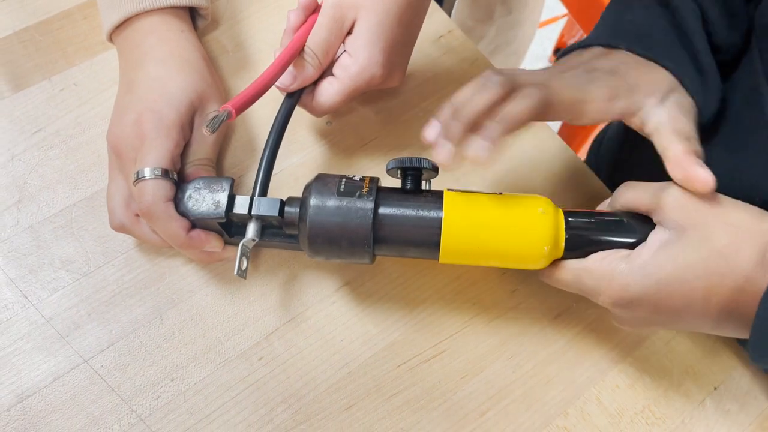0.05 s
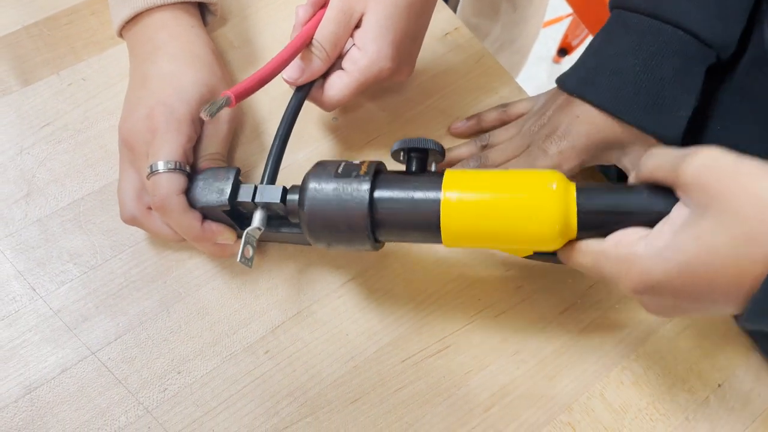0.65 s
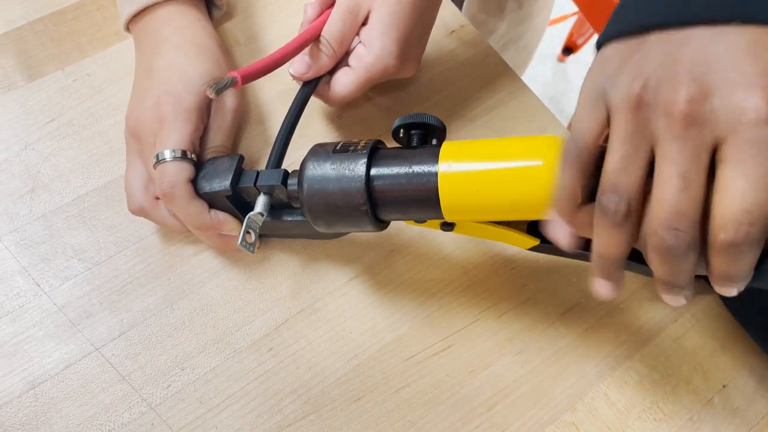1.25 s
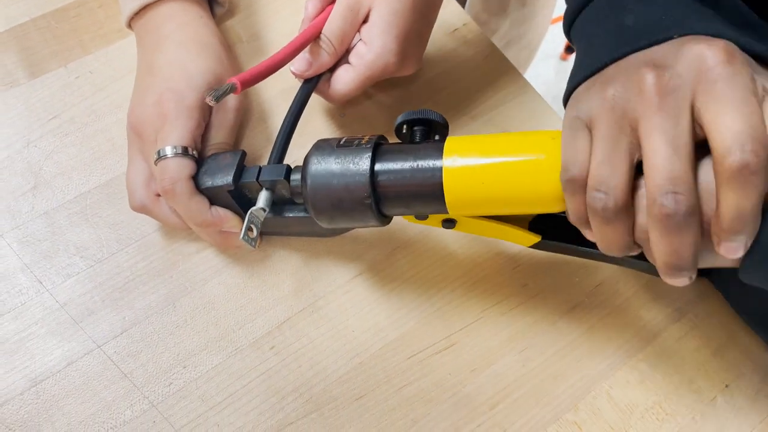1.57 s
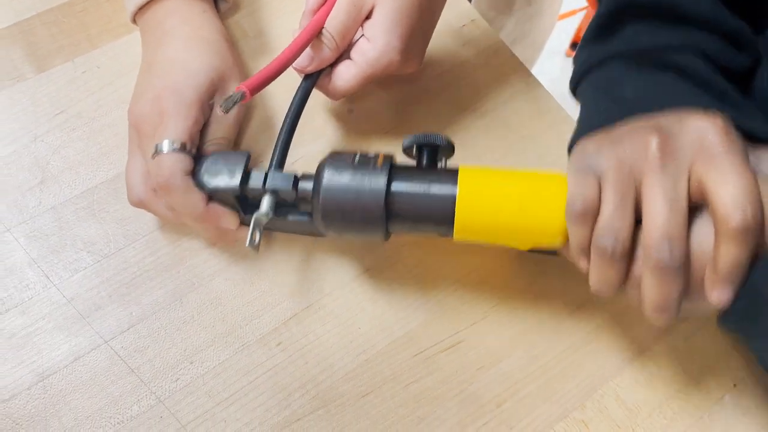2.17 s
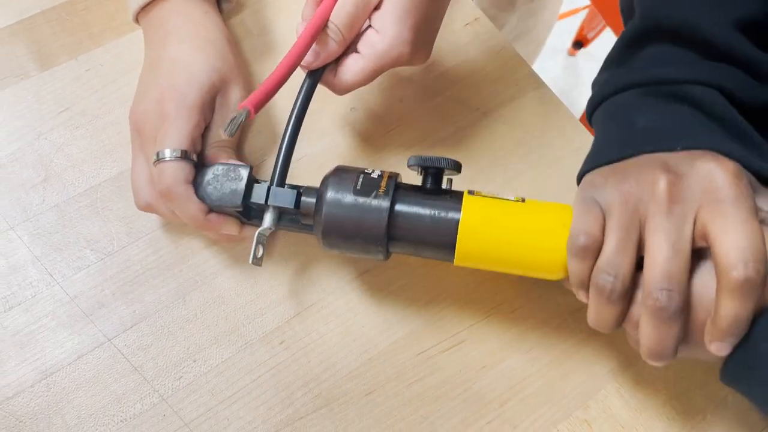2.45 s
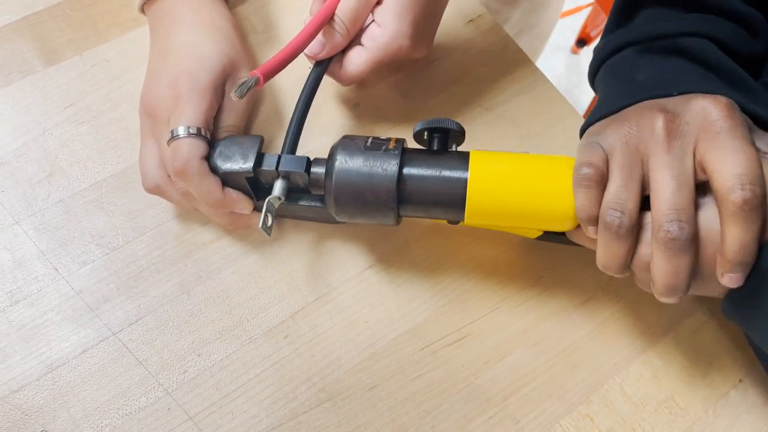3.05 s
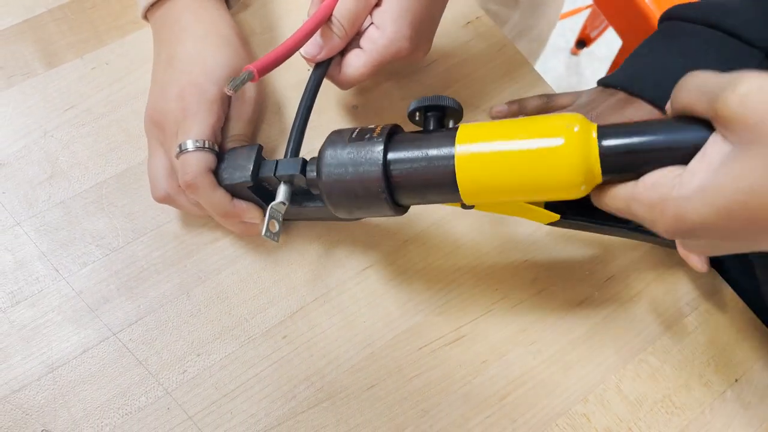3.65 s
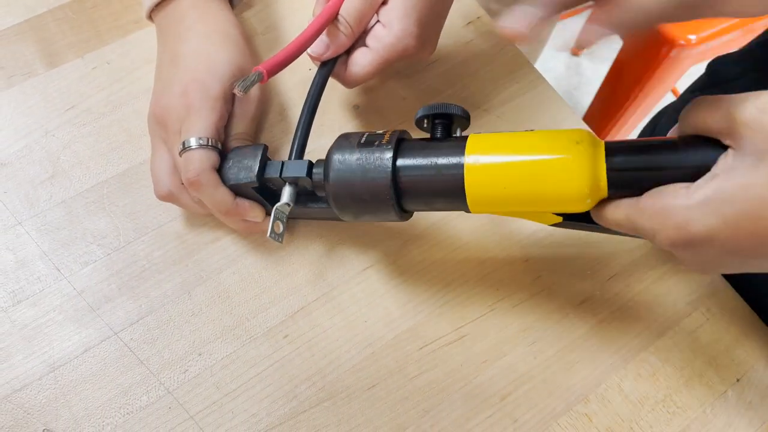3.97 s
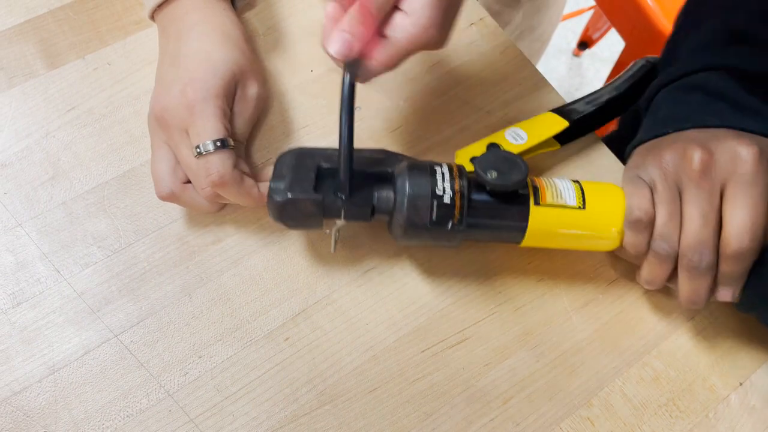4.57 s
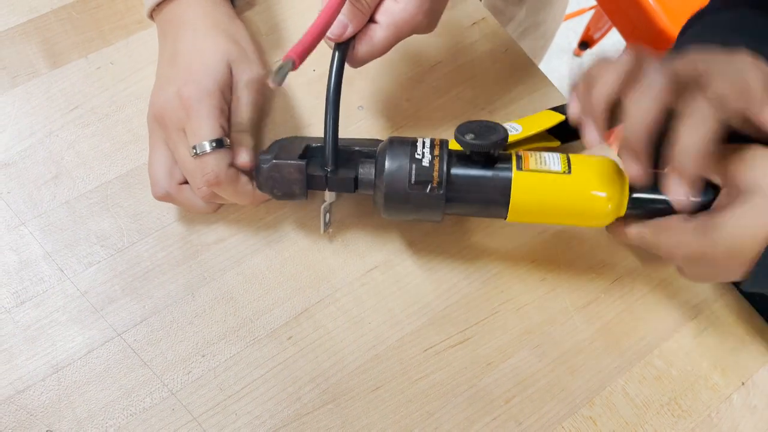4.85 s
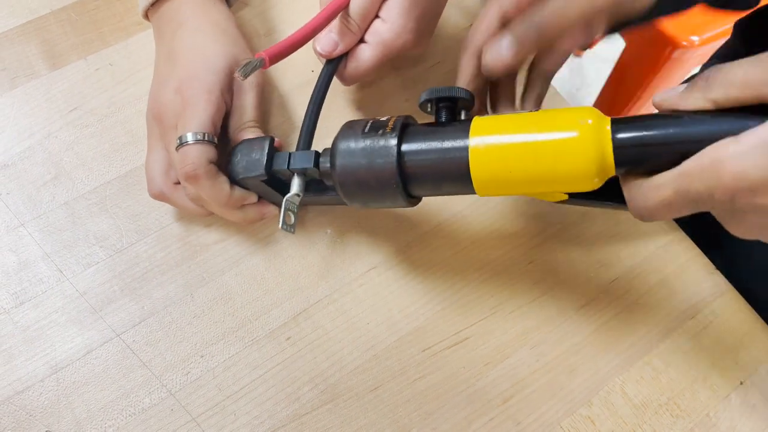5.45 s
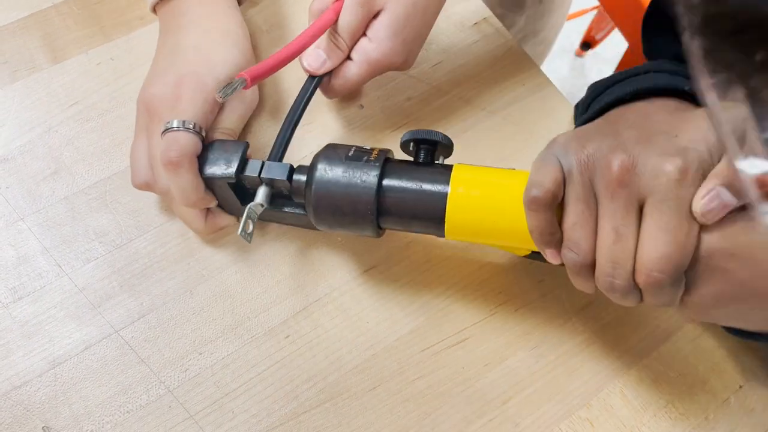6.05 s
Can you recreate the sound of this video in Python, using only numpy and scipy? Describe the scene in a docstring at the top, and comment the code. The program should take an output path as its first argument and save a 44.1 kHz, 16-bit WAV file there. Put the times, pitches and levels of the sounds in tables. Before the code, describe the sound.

A low ventilation rumble with a faint fan hum runs throughout in a workshop. Close to the microphone, sleeves rustle and palms rub softly as a hand-pumped crimper is worked on a wooden table. From 0.5 seconds the steel lever ticks and the tool knocks dully, with a firmer thump and click at 1 second, then a faint, thin pivot squeak. At 2.2 seconds the lever snaps against its stop and the table shudders with a low boom. After a lull, a sharp metallic click and wooden clack land at about 3.5 seconds, and another knock near 4. The loudest moment comes around 4.5 seconds: a quick cluster of heavy thumps and hard clacks as the tool tips over, scuffs and rings briefly. Lighter knocks and ticks follow until 6 seconds, each with a slight scrape, ending in a soft rustle.

```python
"""A hand-pumped hydraulic crimper is levered against a wooden workbench, over steady ventilation.
Sleeves rustle and palms rub; from 0.5 s the steel lever ticks and the tool knocks, each knock a falling
chirp as bending waves cross the top, treble first. The pivot squeaks faintly. At 2.2 s the lever snaps
on its stop and the bench shudders. From 3.5 s knocks and hard clacks crowd in, peaking near 4.5 s as the
tool tips over and rings. Lighter knocks follow until 6 s, each scraping to rest, then a last rustle."""
import sys
import numpy as np
from scipy import signal
from scipy.fft import rfft, irfft
from scipy.io import wavfile

SR = 44100
rng = np.random.default_rng(int(sys.argv[2]) if len(sys.argv) > 2 else 0)


def wav_out(sig):
    """Save sig, one row per channel (or a flat mono array), as 16-bit PCM at SR to the path in sys.argv[1]."""
    wavfile.write(sys.argv[1], SR, np.round(np.clip(np.atleast_2d(sig).T, -1, 1) * 32767).astype(np.int16))


N = 277830
T = np.arange(N) / SR
F = np.maximum(np.arange(N // 2 + 1) * SR / N, 1)
LEFT_RIGHT = np.array([[1], [-1]])


def undb(db):
    """Decibels to gain."""
    return 10 ** (np.asarray(db) / 20)


def along(points):
    """A curve through (Hz, value) points on a log-frequency axis."""
    hz, value = np.transpose(points)
    return np.interp(np.log(F), np.log(hz), value)


def shaped(x, gain):
    """Filter by a gain for every frequency."""
    return irfft(rfft(x) * gain, N)


def unit(x):
    """Scale to rms 1."""
    return x / np.sqrt(np.mean(x ** 2))


def noise(colour, channels=2):
    """Independent noises with a (Hz, dB) colour, at rms 1."""
    return unit(shaped(rng.standard_normal((channels, N)), undb(along(colour))))


def wander(rate_hz):
    """A smooth random wander with spread 1."""
    return unit(shaped(rng.standard_normal(N), np.exp(-(F / rate_hz) ** 2)))


def swell(s, length):
    """A smooth rise and fall around time s."""
    return np.exp(-(2 * (T - s) / length) ** 2)


def swells(moves):
    """Envelope of a table of (centre s, length s, dB) movements."""
    return sum(undb(db) * swell(s, length) for s, length, db in moves)


def contact(s, corner_hz):
    """Spectrum of a smooth push at time s; a softer contact has a lower corner."""
    return np.exp(-2j * np.pi * F * s) / (1 + 1j * F / corner_hz) ** 4


def favouring(hz, q, freqs=F):
    """The place of a blow favours the modes around one frequency."""
    return 1 / (1 + 1j * q * (freqs / hz - hz / freqs))


def ringing(modes, sag=0, sag_s=0.034):
    """Spectrum of a set of decaying modes; their pitch may start high and sag."""
    t = T[:SR]
    warped = t + sag * sag_s * (1 - np.exp(-t / sag_s))
    ring = sum(undb(db) * np.sin(2 * np.pi * hz * warped) * undb(-60 * t / t60) for hz, db, t60 in modes)
    return rfft(ring, N)


def alternating(modes):
    """Spectrum of ringing modes, every other one in opposite polarity."""
    return ringing(modes[::2]) - ringing(modes[1::2])


def resonances(peaks):
    """Steep response of (Hz, half-width Hz, dB) resonances, with unit power gain."""
    gain = sum(undb(db) * favouring(hz, hz / (2 * width)) ** 2 for hz, width, db in peaks)
    return gain / np.sqrt(np.mean(np.abs(gain) ** 2))


def voiced(burst, response):
    """Spectrum of a random burst, scaled to ring a response as strongly as an even burst would."""
    spectrum, weight = rfft(burst), np.abs(response) ** 2
    power = np.abs(spectrum) ** 2
    return spectrum * np.sqrt(power.mean() * weight.mean() / (power * weight).mean(axis=1, keepdims=True))


def off_centre(x, lag_s):
    """A source off to one side reaches the left microphone later than the right."""
    return shaped(x, np.exp(-1j * np.pi * F * lag_s * LEFT_RIGHT))


# The rumble's colour. Each row: frequency in Hz, relative level in dB.
RUMBLE_COLOUR = [(15, -56.5), (25, -20), (59, 3), (91, -3), (216, -18), (284, -27), (316, -15),
                 (414, -21.5), (769, -26), (4330, -47), (7630, -74), (9720, -60.5), (15800, -71)]
# Stereo width of the air and the reverb. Each row: frequency in Hz, side against mid in dB.
STEREO_WIDTH = [(60, -41.5), (200, -14), (380, -8), (700, 0), (2400, -7), (8000, 3.5)]
# The duct's hollow ring. Each row: centre in Hz, half-width in Hz, relative level in dB.
DUCT_PEAKS = [(870, 110, -4), (997, 210, -0.5), (1320, 34, -22.5), (2635, 130, -7.5)]
# The fan's hum. Each row: pitch in Hz, relative level in dB.
FAN_TONES = [(209.9, -52), (263.8, -61), (317.6, -54.5), (360.7, -58), (775.2, -63.5), (872.1, -67.5),
             (1416, -70.5)]

def ventilation(rumble_db=-40.5, fan_db=-2, duct_db=-61, waver_db=3.0, drift_rad=1.65):
    """Duct rumble, alike in both ears in the bass, with a hollow rush and wavering fan tones."""
    mid, side = noise(RUMBLE_COLOUR)
    rumble = (mid + LEFT_RIGHT * shaped(side, undb(along(STEREO_WIDTH)))) * undb(rumble_db)
    rush = undb(duct_db + wander(8.5)) * shaped(rng.standard_normal((2, N)), resonances(DUCT_PEAKS))
    hum = 0
    for hz, db in FAN_TONES:
        level = undb(db + fan_db + waver_db * wander(0.47))
        hum += level * np.sin(2 * np.pi * hz * T + drift_rad * wander(3.35))
    return rumble + rush + np.sqrt(2) * hum


# The workshop's decay. Each row: band centre in Hz, t60 in seconds.
ROOM_DECAY = [(100, 0.71), (400, 0.53), (1000, 0.25), (4000, 0.082), (12000, 0.11)]
# EQ on the reverb send. Each row: frequency in Hz, gain in dB.
REVERB_SEND = [(60, -6.5), (200, -10.5), (500, -11), (1200, -14), (4000, -12), (12000, -19.5)]

def room(x, predelay_s=0.0034, build_s=0.0012):
    """Diffuse workshop reflections; the treble dies first and the bass is shared by both ears."""
    mid, side = rfft(rng.standard_normal((2, N)))
    width = undb(along(STEREO_WIDTH))
    field = (mid + LEFT_RIGHT * side * width) / np.sqrt(1 + width ** 2) * undb(along(REVERB_SEND))
    age = np.maximum(T - predelay_s, 0)
    tail = 0
    for centre_hz, t60 in ROOM_DECAY:
        band = along([(hz, hz == centre_hz) for hz, _ in ROOM_DECAY])
        fade = (1 - np.exp(-age / build_s)) * undb(-60 * age / t60)
        tail += irfft(field * band, N) * fade / np.sqrt(np.sum(fade ** 2))
    return signal.fftconvolve(x, tail, axes=1)[:, :N]


# An arm pumps or changes grip. Each row: centre in seconds, length in seconds, relative level in dB.
ARM_SWINGS = [(.08, 0.49, -71), (.61, 0.29, -71.5), (1.38, 0.21, -69), (1.6, 0.17, -75),
              (1.93, 0.22, -71.5), (2.2, 0.088, -74), (2.58, 0.2, -79), (3.27, 0.065, -73),
              (3.41, 0.2, -69.5), (3.62, 0.32, -72), (4.23, 0.3, -69.5), (4.58, 0.26, -64.5),
              (5.03, 0.59, -76), (5.55, 0.25, -70.5), (5.72, 0.12, -66.5), (5.88, 0.17, -73),
              (6.25, 0.52, -74)]
# A palm drags on the bench. Each row: centre in seconds, length in seconds, relative level in dB.
PALM_RUBS = [(.21, 0.022, -35), (.75, 0.15, -35), (2.18, 0.11, -37.5), (3.49, 0.16, -37),
             (4.65, 0.058, -20.5), (5.05, 0.27, -34.5), (5.27, 0.15, -44.5), (5.9, 0.027, -39)]

def handling(rub_gain_db=-3, grip_db=-69, slide_gain_db=3, sleeve_gain_db=-2, uneven_db=2, crinkle_db=3):
    """Hands and tool drag unevenly on the wood; each arm move rustles the sleeve and slides the grip."""
    arm = swells(ARM_SWINGS)
    resting = undb(-47)  # hands holding the tool are never quite still
    rub = np.sqrt(resting ** 2 + swells(PALM_RUBS) ** 2 + settling() ** 2) * undb(uneven_db * wander(25))
    slide = np.hypot(undb(grip_db), undb(slide_gain_db) * arm) * undb(uneven_db * wander(19))
    sleeve = arm * undb(uneven_db * wander(21) + crinkle_db * (wander(500) - 0.5))
    wood = noise([(60, -44), (130, 5.5), (200, 0), (330, -6), (520, -20), (1200, -39), (4000, -109)], 1)
    skin = noise([(300, -22), (1500, 4.5), (3000, 11.5), (4600, 10.5), (5800, 7), (6700, 1.5),
                  (7700, -35.5), (15000, -49)])
    cloth_colour = [(2000, -14), (7500, -27.5), (9200, -2.5), (12300, -6), (14000, -18), (16000, -21)]
    shared, *per_ear = noise(cloth_colour, channels=3)
    cloth = unit(off_centre(shared, lag_s=0.000027) + 0.98 * np.array(per_ear))
    return undb(rub_gain_db) * rub * wood + slide * skin + undb(sleeve_gain_db) * sleeve * cloth


# The grip slips. Each row: centre in seconds, length in seconds, level in dB.
GRIP_SCUFFS = [(1.211, 0.043, -58.5), (4.544, 0.06, -50), (4.587, 0.06, -57.5)]

def scuffs(rough_db=4):
    """Skin scuffs brightly over the steel."""
    hiss = noise([(2500, 1), (5000, 2), (6300, -1), (7600, -13), (9500, -2), (12000, -3),
                  (14000, -18), (16000, -4)])
    return swells(GRIP_SCUFFS) * undb(rough_db * wander(190)) * hiss


# The lever lifts. Each row: centre in seconds, length in seconds, pitch in Hz, level in dB.
PIVOT_SQUEAKS = [(1.167, 0.2, 4580, -70.5), (1.34, 0.25, 4650, -70)]

def squeaks(half_width_hz=230, broken_db=3):
    """The dry pivot gives a thin, broken squeak."""
    out = 0
    for s, length, hz, db in PIVOT_SQUEAKS:
        whistle = shaped(rng.standard_normal(N), resonances([(hz, half_width_hz, 0)]))
        out += undb(db) * swell(s, length) * whistle
    return out * undb(broken_db * wander(40))


# Pivot and dies tick. Each row: start in seconds, ping level in dB, ping centre in Hz, barrel level
# in dB, burst t60 in seconds, crack level in dB. Levels are before filtering.
STEEL_TICKS = [(0.5, -48, 4120, -58, 0.031, -47), (0.981, -49, 12000, -71, .008, -38),
               (0.811, -66, 9000, -40, .012, -59), (1.271, -54, 4540, -42, 0.019, -70),
               (1.645, -55, 10140, -74, .036, -62), (2.243, -44, 5700, -27, 0.026, -40.5),
               (2.555, -54, 4400, -66, 0.028, -68), (3.558, -21.5, 4600, -58, 0.006, -38),
               (3.559, -24.5, 5400, -58, 0.012, -34.5), (3.7205, -55, 11000, -80, .008, -54),
               (3.833, -52, 7500, -70, .008, -59), (3.913, -48, 4400, -71, 0.027, -56),
               (3.922, -56, 10500, -72, .01, -57), (3.941, -53, 11500, -70, .008, -49),
               (4.49, -69, 4000, -48.5, 0.86, -69), (4.55, -31.5, 4600, -17, 0.0077, -34),
               (4.5569, -51, 5500, -29, 0.033, -50), (4.588, -50, 6100, -41, 0.12, -46),
               (4.594, -38, 3160, -43, 0.014, -58.5), (4.7166, -35, 6300, -70, 0.0072, -44),
               (4.92, -41.5, 4830, -45, 0.038, -61), (4.938, -67, 3960, -48.5, 0.12, -68),
               (4.957, -48, 4870, -60, 0.022, -58), (5.048, -54, 4460, -66, .007, -56),
               (5.1198, -42, 7600, -62, 0.0069, -57), (5.865, -44, 4900, -38, 0.023, -57),
               (5.922, -43, 9400, -64, 0.016, -48), (5.928, -46, 5200, -60, .012, -49),
               (5.947, -48, 4400, -48, 0.02, -62), (6.086, -53, 8700, -72, 0.0037, -48)]
# The small parts' bright ping. Each row: centre in Hz, half-width in Hz, relative level in dB.
PING_PEAKS = [(2900, 230, -13), (3160, 220, 21), (3600, 88, -21.5), (4050, 270, 15), (4400, 130, 10.5),
              (5500, 400, 11.5), (6500, 140, -9), (10600, 2100, 0), (11000, 680, 2), (13000, 1100, -22)]
# The barrel's lower voice. Each row: centre in Hz, half-width in Hz, relative level in dB.
BARREL_PEAKS = [(1260, 230, 4.5), (1610, 52, 3.5), (1600, 200, -14.5), (2080, 170, -0.5), (2330, 97, -13),
                (2940, 340, -4)]

def ticks(grit_db=4, spread=0.94, rise_s=0.00079, ping_q=4.0, crack_t60_s=0.0085, crack_hz=8500):
    """Steel meets steel with a bright crack and a cluster of tiny impacts that ring parts and barrel."""
    ping, barrel, crack = np.zeros((3, 2, N + SR))
    t = T[:SR // 8]
    freqs = np.maximum(np.fft.rfftfreq(len(t), 1 / SR), 1)
    steel = resonances(PING_PEAKS)
    for s, ping_db, hz, barrel_db, t60, crack_db in STEEL_TICKS:
        shared, left, right, size = rng.standard_normal((4, len(t)))
        grit = unit((shared + spread * np.array([left, right])) * undb(grit_db * size))
        burst = grit * (1 - np.exp(-t / rise_s)) * undb(-60 * t / t60)
        favour = favouring(hz, ping_q, freqs)
        drive = voiced(burst, favour * np.interp(freqs, F, steel))
        span = slice(int(s * SR), int(s * SR) + len(t))
        ping[:, span] += undb(ping_db) * irfft(favour * drive, len(t))
        barrel[:, span] += undb(barrel_db) * burst
        crack[:, span] += undb(crack_db) * shared * undb(-60 * t / crack_t60_s)
    high_pass = 1 / (1 + (crack_hz / F) ** 12)
    ring = 2 * shaped(ping[:, :N], steel) + shaped(barrel[:, :N], resonances(BARREL_PEAKS))
    return ring + shaped(crack[:, :N], high_pass)


# The lever's double clicks. Each row: second click's start in seconds, drive in dB, contact corner
# in Hz, first click against the second in dB, favoured frequency in Hz.
DOUBLE_CLICKS = [(0.499, -36.5, 9300, -8.5, 4150), (0.9817, -25.5, 5330, -9, 3000),
                 (3.4655, -40.5, 6000, 2, 4020), (3.9474, -42.5, 6500, 8, 4400)]
# The lever's ring. Each row: pitch in Hz, relative level in dB, t60 in seconds.
LEVER_MODES = [(1965, -7, 0.02), (2544, -11.5, 0.024), (2920, -8.5, 0.032), (3190, -5, 0.021),
               (3580, -5.5, 0.025), (4130, 0, 0.014), (4750, -7, 0.024), (5330, -1, 0.011),
               (9800, 13, 0.0047), (11300, 14.5, 0.006)]

def lever_clicks(play_s=0.009, vary_db=0.5, detune=0.0038, spot_q=0.93):
    """The lever takes up its play with two clicks; the grip changes its modes a little every time."""
    spectrum = 0
    for s, db, corner_hz, first_db, spot_hz in DOUBLE_CLICKS:
        chance = rng.standard_normal((len(LEVER_MODES), 2))
        modes = [(hz * (1 + detune * shift), mode_db - vary_db * dip, t60)
                 for (hz, mode_db, t60), (shift, dip) in zip(LEVER_MODES, chance)]
        strikes = contact(s, corner_hz) + undb(first_db) * contact(s - play_s, corner_hz)
        spectrum += undb(db) * strikes * favouring(spot_hz, spot_q) * alternating(modes)
    return irfft(spectrum, N)


# The lever closes hard. Each row: start in seconds, drive in dB, contact corner in Hz.
STOP_STRIKES = [(2.2452, -24.5, 7500), (2.2491, -35.5, 7000)]
# The stop's short clink. Each row: pitch in Hz, relative level in dB, t60 in seconds.
STOP_MODES = [(1250, -2.5, 0.023), (1500, -4.5, 0.033), (1690, -5.5, 0.016), (1954, -10.5, 0.028),
              (2220, -9.5, 0.029), (2560, -7.5, 0.015), (2980, -8, 0.024), (3260, -13.5, .02),
              (3970, -13, 0.0088), (5700, -7.5, 0.012)]

def lever_stop():
    """The lever snaps against its stop and bounces once."""
    strikes = sum(undb(db) * contact(s, hz) for s, db, hz in STOP_STRIKES)
    return irfft(strikes * alternating(STOP_MODES), N)


# The tool tips over. Each row: start in seconds, drive in dB, contact corner in Hz.
LANDINGS = [(4.4932, -50, 4000), (4.5509, -36, 7000), (4.5925, -48, 6000)]
# The steel body's note. Each row: pitch in Hz, relative level in dB, t60 in seconds.
BODY_MODES = [(2017, -2, 0.067), (2017, -1.5, 0.083), (3160, -14, .091), (4660, 6, 0.025), (4770, -5, 0.04)]

def body_ring():
    """The steel body sings briefly when it lands, undamped by the hand."""
    strikes = sum(undb(db) * contact(s, hz) for s, db, hz in LANDINGS)
    return irfft(strikes * ringing(BODY_MODES), N)


# Full strokes shake the bench. Each row: start in seconds, drive in dB, push corner in Hz.
FULL_STROKES = [(2.269, -19.5, 301), (3.966, -34.5, 300), (4.313, -29.5, 500), (4.575, -27, 900)]
# The frame's low boom. Each row: pitch in Hz, relative level in dB, t60 in seconds.
FRAME_MODES = [(89.4, -2, 0.4), (120.6, 3.5, 0.6), (161.4, -1.5, 0.68), (246, -10, 0.44), (317, -13, 0.17),
               (443, -6, 0.096)]

def shudders():
    """The bench frame rings on after a heavy stroke, its low modes sagging slightly in pitch."""
    pushes = sum(undb(db) * contact(s, hz) for s, db, hz in FULL_STROKES)
    return irfft(pushes * ringing(FRAME_MODES, sag=0.077), N)


# Hard edges hit the wood. Each row: start in seconds, drive in dB, contact corner in Hz,
# favoured frequency in Hz, focus as a Q.
EDGE_HITS = [(0.9814, 11, 368, 980, 5.5), (2.2503, -20, 890, 507, 3.6), (3.507, -38.5, 1780, 895, 0.33),
             (3.5578, -8.2, 6420, 810, 0.69), (3.9481, -10.5, 597, 943, 2.5),
             (4.4934, -30.5, 5400, 1960, 0.4), (4.5499, -28.5, 6450, 1270, .15),
             (4.5602, -16.5, 6500, 1070, .7), (4.5933, -11.5, 856, 488, 2.8), (5.306, -28, 670, 560, 0.77),
             (5.552, -37.5, 2500, 1100, 1.8), (5.8669, -16, 1200, 800, .1)]
# The clack's woody tone. Each row: pitch in Hz, relative level in dB, t60 in seconds.
WOOD_MODES = [(310.8, -4.5, 0.098), (467.4, -18.5, 0.21), (530.5, -17, 0.1), (700.8, -13, 0.11),
              (716.4, -4, 0.056), (760, -6.5, 0.041), (848, -17.5, 0.13), (921, 2.5, 0.029),
              (1194, -5, 0.029), (1290, -25, .037), (1430, -12, .06), (1530, -23.5, .029),
              (1600, -27.5, .033), (1890, -19.5, .03)]

def clacks(rebound_s=0.0039, rebound=0.49, dull_hz=2270, travel_ms=1.52):
    """A steel edge strikes, rebounds once and rings the wood; where it lands picks the loudest modes."""
    pushes = 0
    for s, db, corner_hz, spot_hz, q in EDGE_HITS:
        strikes = contact(s, corner_hz) + rebound * contact(s + rebound_s, corner_hz)
        pushes += undb(db) * strikes * favouring(spot_hz, q)
    khz = F / 1000
    chirp = np.exp(-2j * np.pi * travel_ms * (2 * np.sqrt(khz) - khz))  # the treble arrives first
    low_pass = 1 / (1 + (F / dull_hz) ** 14)
    return irfft(pushes * chirp * ringing(WOOD_MODES) * low_pass, N)


# The tool bumps the bench. Each row: start in seconds, knock drive in dB, contact corner in Hz,
# thump drive in dB, relative distance.
BENCH_KNOCKS = [(0.5422, 30.5, 218, 11, 0.81), (0.8087, 37, 383, 39.5, .96), (0.9843, 45, 286, 53, 0.22),
                (1.196, 26, 198, 21, 0.69), (1.267, 19, 310, 3, .99), (2.2155, 34, 214, 59.5, 0.631),
                (2.2472, 34.5, 328, 44.5, 0.36), (2.293, 21, 222, 39.5, 0.5),
                (3.5548, 40.5, 354, 50.5, 0.85), (3.558, 34, 482, 41.5, 1.02),
                (3.9445, 41.5, 290, 52.5, 0.77), (4.2923, 18, 179, 53, 0.79), (4.488, 42, 317, 45, 0.905),
                (4.5016, 44.5, 210, 30, 0.56), (4.5486, 47.5, 395, 68, 0.84),
                (4.5596, 40.5, 256, 62.5, 0.588), (4.5953, 47.5, 217, 25.5, .43),
                (4.6387, 32, 244, 36, .72), (4.724, 31, 224, 18, .88), (4.8864, 36, 236, 10.5, 0.92),
                (5.305, -2, 800, 32, .66), (5.3649, 36.5, 216, 9, .895), (5.5474, 40, 339, 34, 0.94),
                (5.8679, 34, 314, 45.5, .82), (5.9712, -1, 169, 49.5, 0.24)]
# Routes through the top, direct first, then via the edges. Each row: travel time in milliseconds
# at 1 kHz and distance 1, signed gain.
WAVE_PATHS = [(4.42, 0.91), (5.21, 0.34), (5.99, -0.00013), (9.67, -0.2), (11.26, 0.21)]

def knocks(thump_hz=95, spring_hz=110, lowest_hz=70, absorbed_hz=680):
    """Bending waves run faster the higher they are, so each push lands as a falling chirp with echoes."""
    phase_per_ms = 4 * np.pi * np.sqrt(F / 1000)
    (direct_ms, direct_gain), *edges = WAVE_PATHS
    echoes = direct_gain + sum(gain * np.exp(-1j * phase_per_ms * (ms - direct_ms)) for ms, gain in edges)
    # a light knock springs back with little bass; the weight settling behind it brings the thump
    spring = F / np.hypot(F, spring_hz)
    waves = 0
    for s, db, corner_hz, thump_db, distance in BENCH_KNOCKS:
        push = undb(db) * spring * contact(s, corner_hz) + undb(thump_db) * contact(s, thump_hz)
        waves += push * np.exp(-1j * phase_per_ms * direct_ms * distance)
    # the top hardly moves below its lowest mode, and the wood absorbs the treble on the way
    low_cut = signal.freqs(*signal.butter(5, lowest_hz, "high", analog=True), F)[1]
    absorption = np.exp(-(F / absorbed_hz) ** 3)
    return irfft(-waves * echoes * low_cut * absorption, N)


def settling(gain_db=-64, rise_s=0.0028, decay_s=0.037):
    """Envelope of the tool scraping to rest after each knock, in step with its strength."""
    power = 0
    for s, db, *_ in BENCH_KNOCKS:
        age = np.maximum(T - s, 0)
        power += (undb(db + gain_db) * (1 - np.exp(-age / rise_s)) * np.exp(-age / decay_s)) ** 2
    return np.sqrt(power)


# The bench's pan. Each row: frequency in Hz, left against right in dB.
BENCH_PAN = [(100, .5), (200, 1), (380, 3.2), (700, 9.5), (1100, 8.5), (1500, 4.5), (2400, .5)]

def scene(bench_lag_s=0.00009, steel_lag_s=0.000027, clack_send_db=2, knock_send_db=-4, steel_send_db=-2):
    """The bench's midrange leans left and arrives there a little late; clacks feed the room most."""
    sub_cut = 1 / (1 + (56 / F) ** 8)  # rolls off below 56 Hz
    dull = shaped(knocks(), sub_cut)
    hard = shaped(clacks(), sub_cut)
    boom = shaped(shudders(), sub_cut)
    steel = ticks() + lever_clicks() + lever_stop() + body_ring()
    pan = undb(LEFT_RIGHT * along(BENCH_PAN) / 2)
    bench = off_centre(shaped(dull + hard, pan / pan.mean(axis=0)), bench_lag_s)
    wood_send = undb(clack_send_db) * hard + undb(knock_send_db) * dull
    reverb = room(wood_send + undb(steel_send_db) * steel.mean(axis=0, keepdims=True))
    friction = handling() + scuffs() + squeaks()
    return bench + off_centre(steel, steel_lag_s) + reverb + boom + friction + ventilation()


def record(dry, ceiling=1.0, top_hz=15850):
    """A phone close by rounds the highest peaks and cuts the top."""
    rounded = dry / (1 + (dry / ceiling) ** 6) ** (1 / 6)
    return signal.sosfilt(signal.ellip(8, 0.2, 70, top_hz, fs=SR, output="sos"), rounded)


dry = scene()
out = record(dry)
wav_out(out)
```